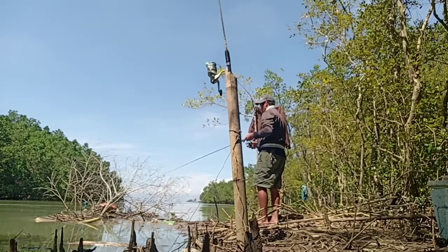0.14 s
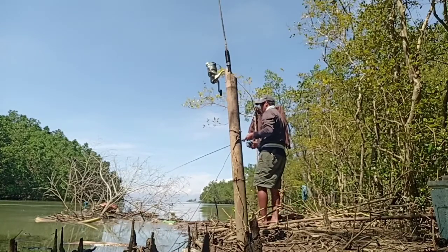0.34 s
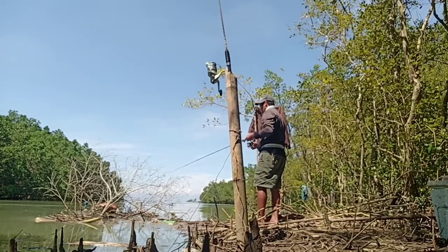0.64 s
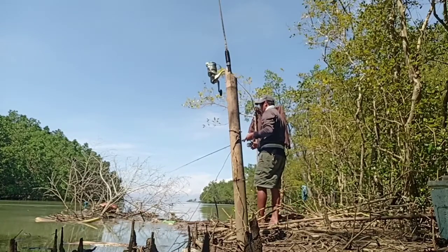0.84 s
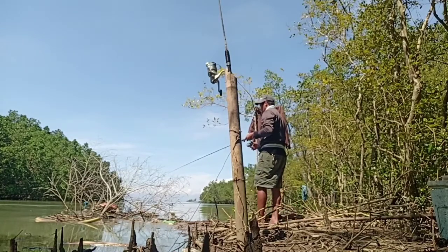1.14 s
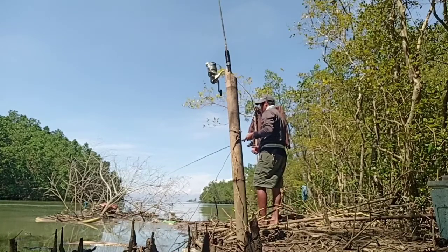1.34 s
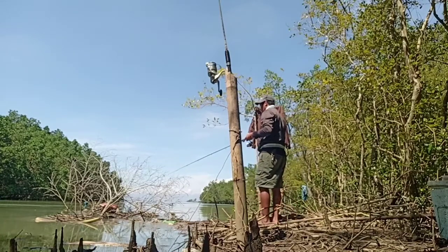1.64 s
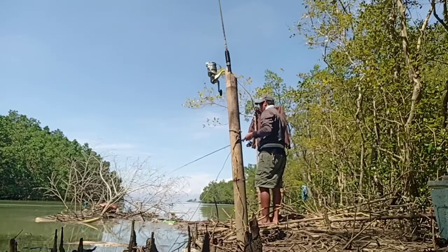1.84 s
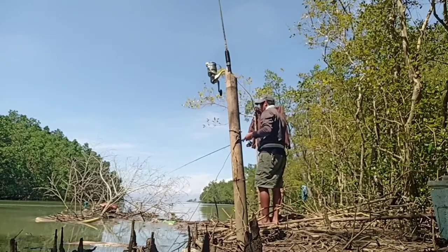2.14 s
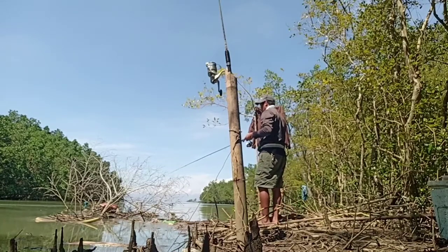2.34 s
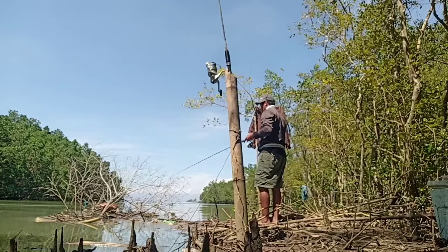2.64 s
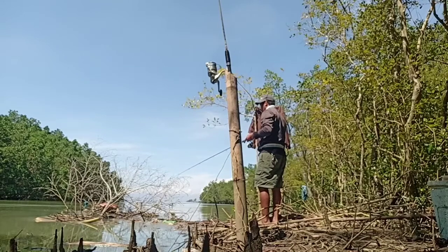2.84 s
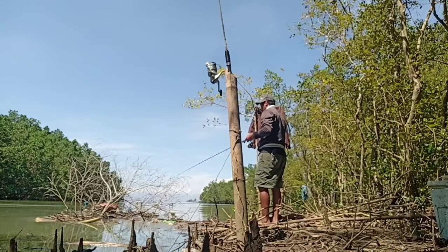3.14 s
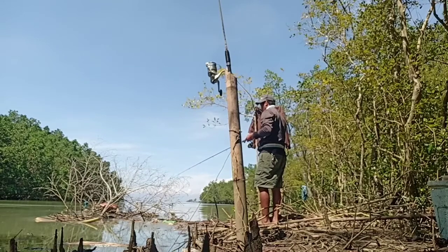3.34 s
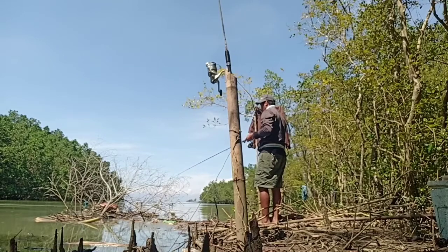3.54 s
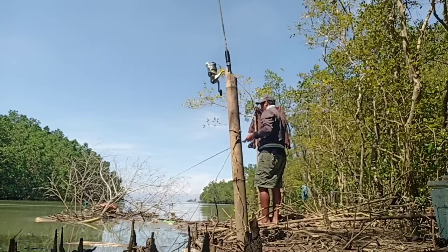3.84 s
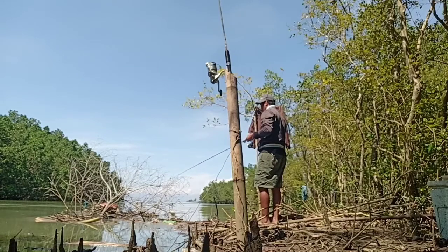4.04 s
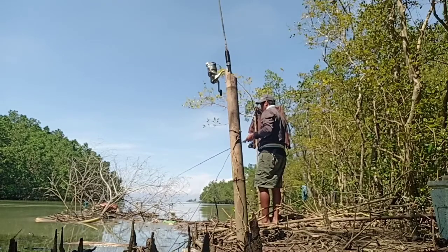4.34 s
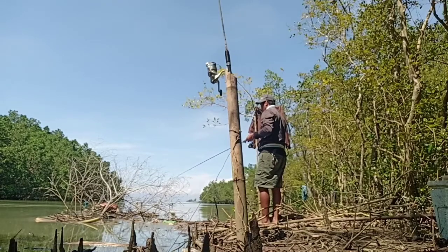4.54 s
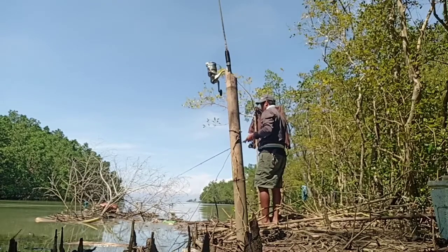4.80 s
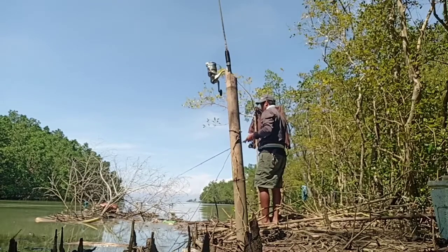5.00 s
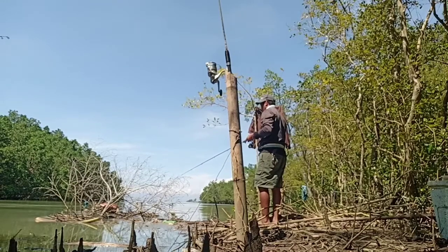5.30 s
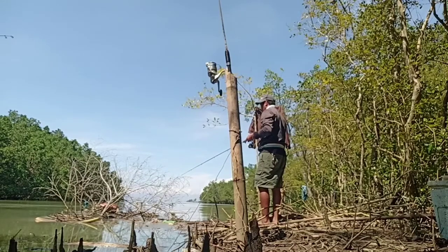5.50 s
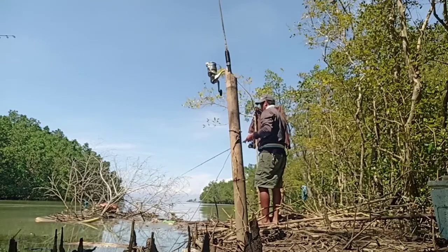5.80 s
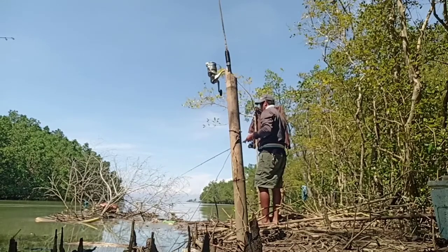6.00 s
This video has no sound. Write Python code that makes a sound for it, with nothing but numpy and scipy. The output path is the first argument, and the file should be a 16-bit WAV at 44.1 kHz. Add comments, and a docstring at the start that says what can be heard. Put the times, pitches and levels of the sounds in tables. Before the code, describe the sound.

A steady, high cicada buzz outdoors, with far-off boats, water and wind rumbling softly beneath and occasional little pops in the mud.

```python
"""Cicadas drone in the trees all round a hot riverbank, each clicking a ringing membrane.
Two far boat engines carry over the water: one thuds through its exhaust, the other hums.
Leaves rustle in short puffs of wind, bubbles click and ring in the mud, a small bird peeps
and a dry twig snaps, over a wash of far water and wind. Two microphone ports a hand apart."""
import sys
import numpy as np
from scipy import signal
from scipy.fft import rfft, irfft, next_fast_len
from scipy.io import wavfile
from scipy.ndimage import uniform_filter1d

SR = 44100
rng = np.random.default_rng(int(sys.argv[2]) if len(sys.argv) > 2 else 0)


def bounce(signal):
    """Save signal as a 16-bit WAV file at the path given by the first command-line argument."""
    frames = np.transpose(np.atleast_2d(signal))
    limited = np.clip(frames, -1, 1)
    pcm = np.round(limited * 32767).astype(np.int16)
    wavfile.write(sys.argv[1], SR, pcm)


N = 271656
N_FFT = next_fast_len(N, True)
TIME_S, BIN_HZ = np.arange(N) / SR, np.fft.rfftfreq(N_FFT, 1 / SR)

# far water and wind, spectrum: f/Hz, relative density/dB
WASH_SPECTRUM = [(20, -29.5), (30, -24), (42, -27), (60, -16), (82, -4.5), (139, -0.5), (180, -3),
                 (232, -9.5), (335, -15.5), (600, -21.5), (850, -26.5), (1090, -30), (2000, -32.5),
                 (4200, -34), (5500, -38.5)]
# wash common to both ports: f/Hz, power share
WASH_COHERENCE = [(30, .6), (70, 0.74), (150, 0.91), (300, 0.667), (650, 0.24), (1100, 0.36), (1800, 0.16),
                  (3000, 0.11)]
# wash band edges: f/Hz
WASH_EDGES_HZ = [110, 300, 650, 1000, 1300, 1600, 1900, 2200, 2600, 3000, 3500, 4000]
# thudding engine: t/s, firing rate/Hz, level/dB
THUD_TRACK = [(0, 26.59, -54.5), (1.5, 26.59, -54), (3, 26.45, -54.5), (4.5, 26.62, -53.5),
              (6.16, 26.7, -54.5)]
# its exhaust: f/Hz, relative density/dB
EXHAUST_SPECTRUM = [(40, -40), (55, -21), (78, -5), (135, 2), (190, -5.5), (250, -20.5), (370, -17),
                    (450, -23), (700, -46)]
# humming engine: t/s, firing rate/Hz, level/dB
HUM_TRACK = [(0, 30.79, -62.5), (2.2, 30.92, -65.5), (2.7, 30.9, -62), (4.5, 30.75, -60.5),
             (6.16, 30.8, -59.5)]
# its harmonics 2, 3, ...: relative level/dB
HUM_HARMONICS_DB = [-8, 1.5, -1.5, 4.5, 1.5, -10, -3.5, 0, -11, -14.5, -12]
# dull part of the rustle: f/Hz, relative density/dB
LEAF_DULL_SPECTRUM = [(1200, -16.5), (1900, -5.5), (2600, 0.5), (3100, 1), (3900, -13.5)]
# bright part of the rustle: f/Hz, relative density/dB
LEAF_BRIGHT_SPECTRUM = [(2600, -15), (3400, 1.5), (4300, 1.5), (4900, -5), (6000, -31)]
# wind puffs in the leaves: t/s, time to fade 20 dB/s, dull level/dB, bright level/dB
WIND_PUFFS = [(0, 0.28, -62.5, -61), (.1, .45, -67, -62), (.2, 0.1, -65, -63.5), (.285, .3, -65.5, -63.5),
              (.365, 0.38, -64.5, -63), (.66, 0.35, -68, -70.5), (.77, 0.39, -67.5, -64.5),
              (1.055, .3, -65, -57), (1.1, 0.26, -68, -61.5), (1.15, .13, -69.5, -63),
              (1.36, 0.08, -69, -70), (1.5, .5, -67.5, -72.5), (1.57, 0.56, -64.5, -71.5),
              (1.76, 0.28, -66, -64.5), (1.87, 0.37, -69.5, -66), (2.15, 0.56, -74, -69.5),
              (2.62, 0.3, -71, -68.5), (3.07, 0.38, -73.5, -69), (3.15, 0.62, -69, -65),
              (3.4, 0.24, -66, -67), (3.66, 0.57, -67, -66), (3.935, 0.48, -67, -65),
              (4.03, 0.27, -65.5, -65.5), (4.17, 0.59, -63, -68.5), (4.49, 0.33, -65.5, -67.5),
              (4.635, 0.03, -68.5, -61), (4.93, 0.22, -65.5, -64.5), (5.28, 0.8, -70, -69),
              (5.415, 0.27, -62, -61), (5.78, 0.13, -69, -69), (6.04, 0.01, -65, -64)]
# bird peeps: t/s, length/s, start f/Hz, end f/Hz, level/dB
BIRD_PEEPS = [(0, 0.024, 3260, 3260, -62.5), (0.104, .025, 3690, 3740, -62),
              (0.141, 0.046, 3800, 3440, -64.5), (0.371, 0.0248, 2960, 2955, -59),
              (0.404, .025, 2950, 2960, -66), (2.151, 0.066, 3400, 3380, -68.5),
              (2.226, .026, 3370, 3380, -70), (5.797, .105, 4153, 4147, -63.5),
              (6.045, 0.032, 3047, 3194, -67.5)]
# twig crack: t/s, level/dB, t60/s
TWIG_CRACK = (4.285, -53, .03)
# mud bubbles: t/s, level/dB, start f/Hz, ring t60/s, rise/(Hz/s), left lag/ms
BUBBLES = [(1.186, -46, 720, 0.081, 9999.5, 0.433), (1.274, -47, 902, 0.021, 3000, .05),
           (4.0418, -39.5, 620, 0.0119, 3000, 0.385), (4.0414, -51.5, 1950, 0.0122, 0, 0.4),
           (4.052, -55.5, 700, .12, 2500.5, .41), (4.172, -50, 1200, 0.0144, 0, 0.576),
           (4.255, -52.5, 650, .015, 0, .45), (4.285, -54.5, 1800, 0.0175, 0, 0.57),
           (4.303, -52, 950, 0.0157, -0.5, 0.29), (4.429, -50, 830, 0.058, 4999.5, 0.418),
           (4.437, -56.5, 1780, .025, 35000, 0.49), (4.508, -54.5, 1744, 0.0315, -0.5, 0.57),
           (4.516, -49.5, 770, 0.056, 0.5, .4), (4.522, -50, 1250, 0.021, 0, 0.505),
           (4.528, -39.5, 801, 0.0453, 3500.5, .35), (4.552, -50, 823, 0.031, 0, 0.344),
           (5.783, -49, 1145, .03, -0.5, 0.496), (5.801, -44, 1129, .025, 4000, 0.46)]
# cicada membrane ring over time: t/s, level/dB
CHORUS_TRACK = [(0, -40.5), (1.5, -40.5), (3, -40), (4.5, -40), (6.16, -40)]
# ring of the drumming membrane: f/Hz, relative density/dB
TYMBAL_SPECTRUM = [(4300, -30.5), (4600, -27.5), (5100, -21.5), (5660, -13.5), (6050, -8.5), (6150, 0.5),
                   (6500, 0), (6900, -8), (7600, -9), (7700, -16), (8450, -18.5), (8600, -29), (8950, -39),
                   (9050, -74)]
# its octave: f/Hz, relative density/dB
OCTAVE_SPECTRUM = [(11500, -41.5), (11650, 0), (12100, -1), (13050, -3.5), (13800, -12.5), (15150, -18),
                   (15250, -31.5), (15400, -33.5)]


def undb(db):
    return 10 ** (np.asarray(db) / 20)


def decay(age_s, t60_s):
    return np.exp(-np.log(1000) * age_s / t60_s)


def per_sample(table):
    """Columns of a time table, one value a sample."""
    times_s, *columns = np.transpose(table)
    return [np.interp(TIME_S, times_s, column) for column in columns]


def per_bin(table):
    """(f/Hz, value) points at every FFT bin, on a log axis."""
    hz, value = np.transpose(table)
    return np.interp(np.log(BIN_HZ + 1), np.log(hz), value)


def colour(x, spectrum, smear_s=0):
    """Filter to a spectrum, silent outside it; echoes smear each port differently. Rms 1."""
    gain = undb(per_bin([(spectrum[0][0] - 1, -200), *spectrum, (spectrum[-1][0] + 1, -200)]))
    if smear_s:
        age_s = np.arange(int(smear_s * SR)) / SR
        tail = rfft(rng.standard_normal((2, SR))[:, :len(age_s)] * decay(age_s, smear_s), N_FFT)
        gain = gain * tail / np.abs(tail)  # echo phase only
    y = irfft(rfft(x, N_FFT) * gain, N_FFT)[..., :N]
    return y / np.sqrt(np.mean(y ** 2))


def walk(rate_hz):
    """Random steps, smoothed twice; spread near 1."""
    hold = int(SR / rate_hz)
    steps = rng.standard_normal(N // 500)[np.arange(N) // hold]
    return 1.3 * uniform_filter1d(uniform_filter1d(steps, hold), hold)


def pulses(rate_hz, wobble, scatter_db):
    """One click a cycle; rate wanders, sizes scatter."""
    cycle = (np.cumsum(rate_hz * (1 + wobble)) / SR + rng.random()).astype(int)
    sizes = undb(scatter_db * rng.standard_normal(N // 50))
    return np.diff(cycle, prepend=cycle[0]) * sizes[cycle]


def ports(x, pan_db, lag_s=0.000327):
    """Sound from the right reaches the left port later. Pan is left over right."""
    index = np.arange(len(x))
    late = np.interp(index - lag_s * SR, index, x)
    return np.array([late * undb(pan_db / 2), x * undb(-pan_db / 2)])


def water_and_wind(level_db=-52):
    """Far wash: bass mostly common to both ports, treble not; each band swells on its own."""
    share = np.clip(per_bin(WASH_COHERENCE), 0, 1)
    common = rfft(ports(rng.standard_normal(N), pan_db=.6), N_FFT)
    separate = rfft(rng.standard_normal((2, N)), N_FFT)
    noise = irfft(np.sqrt(share) * common + np.sqrt(1 - share) * separate, N_FFT)
    wash = rfft(colour(noise, WASH_SPECTRUM), N_FFT)
    band = np.digitize(BIN_HZ, WASH_EDGES_HZ)
    out = np.zeros((2, N))
    for k in range(band.max() + 1):
        swell_db = 1.05 * walk(3.08) + 1.56 * walk(12)
        out += irfft(wash * (band == k), N_FFT)[:, :N] * undb(level_db + swell_db)
    return out


def thudding_engine():
    """Firing pulses through an exhaust."""
    firing_hz, level_db = per_sample(THUD_TRACK)
    firings = pulses(firing_hz, wobble=0.005909 * walk(6), scatter_db=0.9)
    return colour(firings, EXHAUST_SPECTRUM) * undb(level_db)


def humming_engine(drift_rad=1.443, fade_db=2.0):
    """Beat lost over the distance: each harmonic drifts and fades alone."""
    firing_hz, level_db = per_sample(HUM_TRACK)
    phase = 2 * np.pi * np.cumsum(firing_hz * (1 + 0.004022 * walk(4))) / SR
    hum = sum(np.sin(k * phase + drift_rad * walk(2.5)) * undb(harmonic_db + fade_db * walk(6))
              for k, harmonic_db in enumerate(HUM_HARMONICS_DB, 2))
    return hum * undb(level_db)


def leaves(ticks_per_s=4000, attack_s=.01, calm_db=(-80, -79), patch_db=3, patch_hz=35):
    """Dry ticks blurred to a rustle; each puff swells fast and dies away."""
    hits = rng.random((2, N)) < ticks_per_s / SR
    ticks = hits * undb(3.9 * rng.standard_normal((2, N))) * np.sign(rng.standard_normal((2, N)))
    power = np.ones(N) * undb(calm_db)[:, None] ** 2  # rows: dull, bright
    for start_s, fade_s, dull_db, bright_db in WIND_PUFFS:
        age_s = np.clip(TIME_S - start_s, 0, None)
        envelope = np.minimum(age_s / attack_s, 1) * undb(-20 * age_s / fade_s)
        power += (envelope * undb([[dull_db], [bright_db]])) ** 2
    dull = colour(ticks, LEAF_DULL_SPECTRUM, smear_s=.012) * np.sqrt(power[0])
    bright = colour(ticks, LEAF_BRIGHT_SPECTRUM, smear_s=.012) * np.sqrt(power[1])
    rustle = rfft(dull + bright, N_FFT)
    eighth_octave = 8 * np.log2(np.clip(BIN_HZ, 1500, 6000) / 1500)
    out = np.zeros((2, N))
    for k in range(17):  # each leaf's pitch comes and goes alone
        band = np.clip(1 - np.abs(eighth_octave - k), 0, 1)
        out += irfft(rustle * band, N_FFT)[:, :N] * undb(patch_db * walk(patch_hz))
    return out


def bird(edge_s=0.0088, fade_db_per_s=40, direct_db=-2, echo_db=-6):
    """Short, slightly hoarse whistles, blurred by the trees."""
    peeps = np.zeros(N + SR)
    wobble_hz = 18 * walk(80)
    for start_s, length_s, start_hz, end_hz, level_db in BIRD_PEEPS:
        age_s = np.linspace(0, length_s, int(length_s * SR))
        span = slice(int(start_s * SR), int(start_s * SR) + len(age_s))
        pitch_hz = np.linspace(start_hz, end_hz, len(age_s)) + wobble_hz[span]
        whistle = np.sin(2 * np.pi * np.cumsum(pitch_hz) / SR)
        gate = np.clip(np.minimum(age_s, length_s - age_s) / edge_s, 0, 1)
        peeps[span] += whistle * gate * undb(level_db - fade_db_per_s * age_s)
    echo = rng.standard_normal((2, SR // 4)) * decay(TIME_S[:SR // 4], t60_s=.06)
    echo *= undb(echo_db) / np.sqrt(np.sum(echo ** 2, axis=1, keepdims=True))
    flutter = 1 + .45 * np.array([walk(60), walk(60)])
    direct = peeps[:N] * flutter * undb(direct_db)
    return direct + signal.fftconvolve(peeps[None, :N], echo, axes=1)[:, :N]


def twig():
    """A dry twig snaps: a short burst of treble-heavy noise."""
    start_s, level_db, t60_s = TWIG_CRACK
    age_s = TIME_S - start_s
    crack = np.diff(rng.standard_normal((2, N + 1)))
    return crack * (age_s > 0) * decay(np.clip(age_s, 0, 1), t60_s) * undb(level_db)


def bubbles(faint_count=70, attack_share=0.06, click_db=-10.5):
    """The skin bursts with a click, then a sine rings and may rise; faint ones burst at random."""
    out, age_s = np.zeros((2, N + SR)), TIME_S[:SR // 10]
    faint = [(when * N / SR, -66 + 8 * size ** 2, 600 + 1100 * pitch, .03, 10000, 0.473)
             for when, size, pitch in rng.random((faint_count, 3))]
    for start_s, level_db, start_hz, t60_s, rise_hz_per_s, lag_ms in BUBBLES + faint:
        ring = np.sin(2 * np.pi * (start_hz + rise_hz_per_s * age_s / 2) * age_s)
        envelope = np.minimum(age_s / (attack_share * t60_s), 1) * decay(age_s, t60_s)
        click = uniform_filter1d(rng.standard_normal(len(age_s)), size=7) * decay(age_s, t60_s=.008)
        plop = (ring * envelope + click * undb(click_db)) * undb(level_db)
        at = int(start_s * SR)
        out[:, at:at + len(plop)] += ports(plop, pan_db=0, lag_s=lag_ms / 1000)
    return out[:, :N]


def tymbal_clicks(throb_db, insects_per_port=16):
    """Each insect clicks at 200-270 Hz and throbs at its own rate."""
    crowd = np.zeros((2, N))
    for k, (speed, throb, start_cycle) in enumerate(rng.random((2 * insects_per_port, 3))):
        clicks = pulses(200 + 70 * speed, wobble=.04 * walk(30), scatter_db=2.59)
        at = np.flatnonzero(clicks)
        throb_hz = 8.8 + 4.5 * throb ** 2
        beat = np.sin(2 * np.pi * (throb_hz * TIME_S[at] + start_cycle))
        crowd[k % 2, at] += clicks[at] * undb(throb_db * beat)
    return crowd


def cicadas(throb_hz=9.7, octave_db=-59.5, octave_pan_db=-5):
    """Membrane ring plus a weaker octave, more from the right; the crowd throbs slightly together."""
    throb = np.sin(2 * np.pi * np.cumsum(throb_hz + .6 * walk(1.502)) / SR)
    ring = colour(tymbal_clicks(throb_db=2.2), TYMBAL_SPECTRUM, smear_s=.05)
    ring *= undb(per_sample(CHORUS_TRACK)[0] + .22 * walk(6) + 0.45 * throb)
    octave = colour(tymbal_clicks(throb_db=2.8), OCTAVE_SPECTRUM, smear_s=.07)
    octave *= undb(octave_db + 0.84 * throb)
    pan = undb(np.array([[1], [-1]]) * octave_pan_db / 2)
    return ring + octave * pan


def scene():
    drone = cicadas()
    boats = ports(thudding_engine() + humming_engine(), pan_db=0.24)
    return drone + boats + water_and_wind() + leaves() + bubbles() + bird() + twig()


def record(dry):
    """Band-stop between the drone and its octave; low-pass on top."""
    gap_hz, top_hz = (9000, 11550), 15380
    bandstop = signal.ellip(6, .1, 60, gap_hz, "bandstop", fs=SR, output="sos")
    lowpass = signal.ellip(10, .2, 70, top_hz, fs=SR, output="sos")
    return signal.sosfilt(lowpass, signal.sosfilt(bandstop, dry))


dry = scene()
out = record(dry)
bounce(out)
```